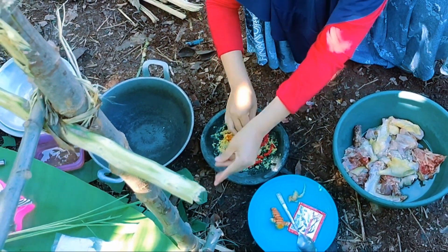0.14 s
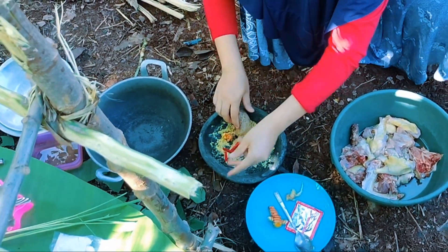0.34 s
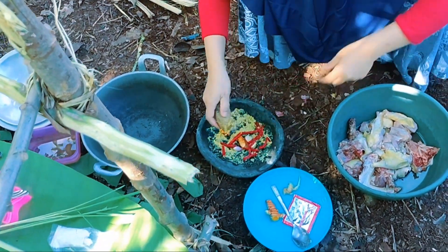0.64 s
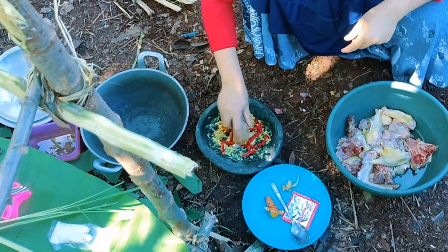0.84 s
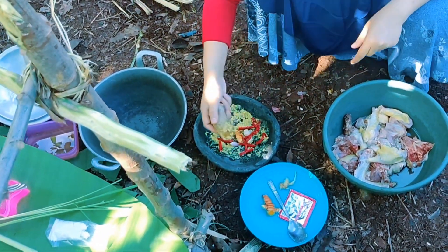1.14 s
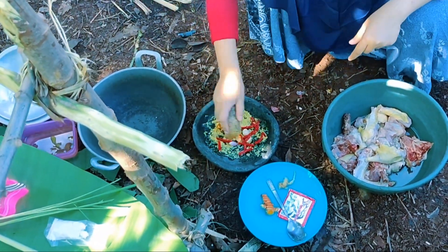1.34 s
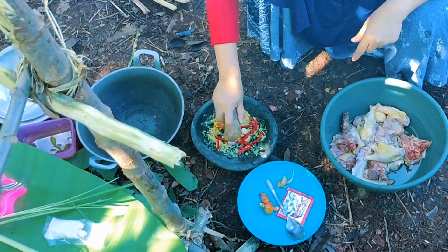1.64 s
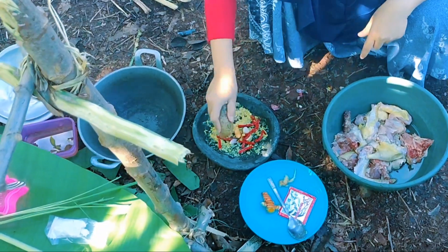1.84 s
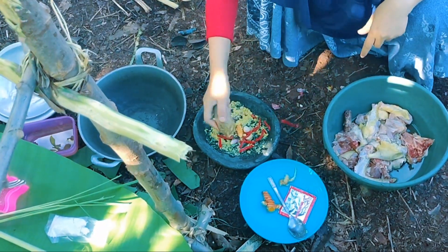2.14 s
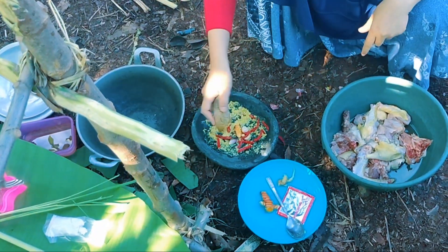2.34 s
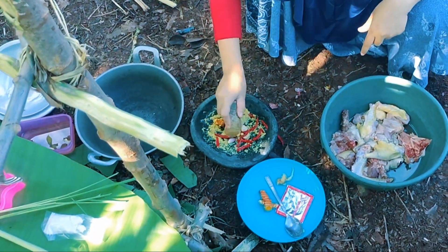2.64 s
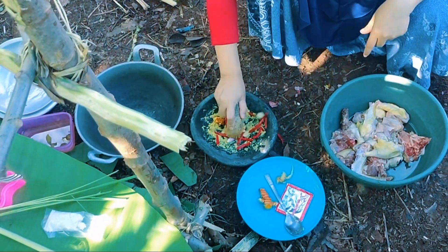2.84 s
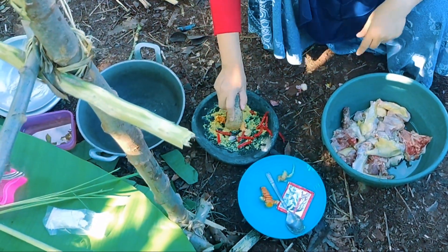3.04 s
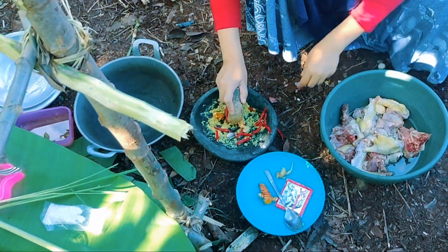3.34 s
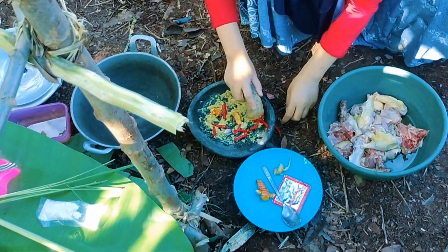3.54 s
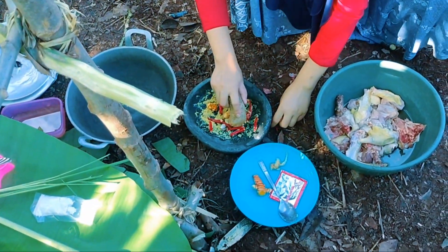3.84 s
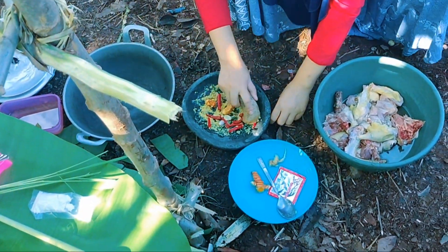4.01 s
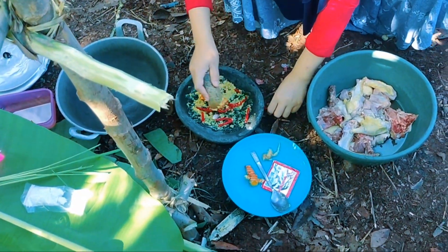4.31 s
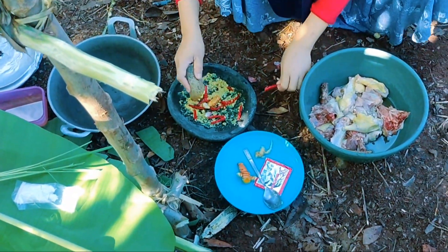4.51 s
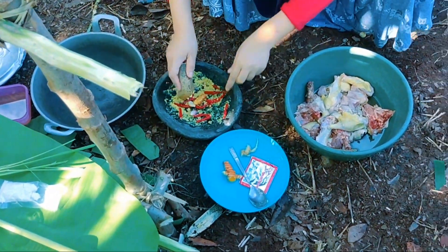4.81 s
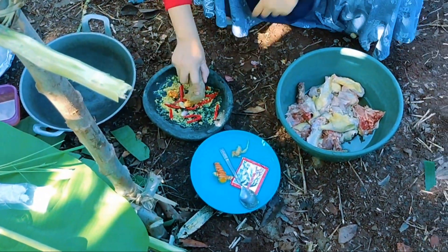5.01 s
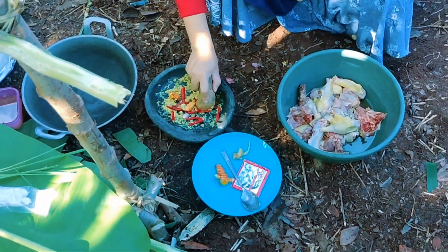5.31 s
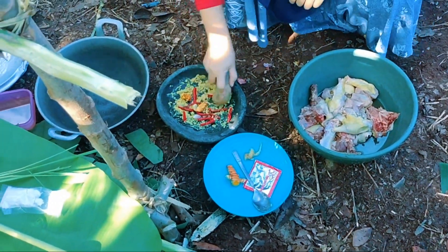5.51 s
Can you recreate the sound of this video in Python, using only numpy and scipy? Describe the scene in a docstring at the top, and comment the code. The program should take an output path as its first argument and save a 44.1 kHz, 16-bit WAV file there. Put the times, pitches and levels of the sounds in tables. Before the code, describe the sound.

Stone pestle grinds and crushes wet chillies in a stone mortar with gritty rasps, snaps and knocks; faint chick peeps, distant engine rumble growing.

```python
"""Chillies and spices are crushed with a stone pestle in a shallow stone mortar on the ground outdoors.
First cloth slides and fingers sweep the pieces together; blows excite damped stone modes, and skins snap.
From 1.5 s grinding strokes grate by stick-slip and crush the pulp with bursts of ringing fractures.
A chick's falling whistles peep faintly from 1.7 s; the hardest knock rings out at 4 s, then clothes rustle.
Throughout, the noise and drifting tones of a distant engine slowly grow; its rumble swells at the end."""
import sys
import numpy as np
from scipy import signal
from scipy.fft import rfft, irfft, next_fast_len
from scipy.io import wavfile

SR = 44100
rng = np.random.default_rng(int(sys.argv[2]) if len(sys.argv) > 2 else 0)


def persist_wave(psi):
    """Save psi, clipped to +-1, as 16-bit WAV."""
    counts = np.round(np.clip(psi, -1, 1) * 32767).astype(np.int16)
    wavfile.write(sys.argv[1], SR, np.atleast_2d(counts).T)


N = 249606
TIME = np.arange(N) / SR


def from_db(db):
    """Logarithmic level: decibels become an amplitude gain."""
    return 10 ** (np.asarray(db) / 20)


def rms_one(x):
    """Normalisation: scale a signal to an rms of 1."""
    return x / np.sqrt(np.mean(x ** 2) + 1e-20)


def at_hz(spectrum, hz):
    """Spectral interpolation: read a level in dB along a logarithmic frequency axis."""
    points = np.array(spectrum)
    return np.interp(np.log(hz), np.log(points[:, 0]), points[:, 1])


def drift(knots_per_s):
    """Random modulation: straight lines join random knots; rms 1."""
    knots = rng.standard_normal(N // 10)
    return rms_one(np.interp(TIME * knots_per_s, np.arange(len(knots)), knots))


def swells(rows, release_s, lag_s=0):
    """Exponential envelope: each gesture (full_s, rise_s, hold_s, level_db) builds up, holds and dies away."""
    out = np.zeros(N)
    for full_s, rise_s, hold_s, level_db in rows:
        t = TIME - full_s - lag_s
        rise = np.minimum(t, 0) / rise_s
        fall = np.maximum(t - hold_s, 0) / release_s
        out += from_db(level_db) * np.exp(rise - fall)
    return out


def noise(spectrum):
    """Spectral shaping: steady coloured noise that falls away steeply outside its range; rms 1."""
    size = next_fast_len(N)
    hz = np.maximum(np.arange(size // 2 + 1) * SR / size, 1)
    skirts = 1 / (1 + (spectrum[0][0] / hz) ** 6) / (1 + (hz / spectrum[-1][0]) ** 12)
    white = rfft(rng.standard_normal(size))
    return rms_one(irfft(white * from_db(at_hz(spectrum, hz)) * skirts, size)[:N])


def ring(force, hz, t60):
    """Damped resonance: a unit click sets off a sine that starts at height 1 and falls 60 dB in t60 seconds."""
    radius = from_db(-60 / (t60 * SR))
    angle = 2 * np.pi * min(hz, .45 * SR) / SR
    # the tiny offset keeps the filter clear of vanishingly small numbers
    return signal.lfilter([0, np.sin(angle)], [1, -2 * radius * np.cos(angle), radius * radius], force + 1e-18)


def soften(x, cut_hz):
    """Contact compliance: a soft contact passes only the lows."""
    return signal.sosfilt(signal.butter(2, min(cut_hz, .45 * SR), fs=SR, output="sos"), x + 1e-18)


def radiate(x, low_hz=560):
    """Radiation efficiency: a small bowl radiates little bass."""
    return signal.sosfilt(signal.butter(2, low_hz, "high", fs=SR, output="sos"), x)


def grit(per_s, spread_db):
    """Random impulse process: tiny fractures at chance moments, of uneven size and sign."""
    sizes = from_db(spread_db * np.minimum(rng.exponential(1, N), 4))
    return sizes * rng.choice([-1, 1], N) * (rng.random(N) < per_s / SR)


def grains(spectrum, per_s, spread_db, cycles, shift=1, count=20):
    """Granular emission: fractures ring for a few cycles at one of many pitches; shift slides the spectrum."""
    clicks = grit(per_s, spread_db)
    dealt = rng.integers(0, count, N)   # which pitch each fracture takes
    out = 0
    for k, hz in enumerate(np.geomspace(spectrum[0][0], spectrum[-1][0], count)):
        rung = ring(clicks * (dealt == k), hz, cycles / hz)
        rung = rms_one(np.diff(rung, prepend=0))
        # the root of the pitch allows for bands that widen with pitch
        out = out + rung * np.sqrt(hz) * from_db(at_hz(spectrum, hz / shift))
    return rms_one(out)


# modes of the mortar, the first two close enough to beat: pitch_hz, level_db, free_t60_s, sign
MORTAR_MODES = [(1672, -12, .065, -1), (1759, -5.5, .085, 1), (310, -28, .04, -1), (630, -28, .024, 1),
                (795, -25, .035, -1), (940, -22, .045, -1), (1255, -24, .035, -1), (1442, -26, .045, 1),
                (1956, -7.7, .0103, 1), (2500, -14, .012, 1), (2900, -22, .007, 1), (3078, -27, .095, 1),
                (3382, -26, .01, 1), (3780, -35, .077, 1), (5885, -31, .024, 1)]
# modes of the pestle, singing as it drags: pitch_hz, relative_db, t60_s, sign
PESTLE_MODES = [(866, -16, 0.019, -1), (2820, -16.5, 0.018, 1), (3100, -18, 0.02, 1),
                (3630, -39.5, .025, 1), (5200, -42.5, .012, -1)]


def stone(force, grip, pestle_db):
    """Modal superposition: both stones ring; pressing them together weakens and shortens the mortar's long modes."""
    longest = MORTAR_MODES[1][2] * grip
    out = 0
    for hz, db, t60, sign in PESTLE_MODES:
        out = out + np.sign(sign) * from_db(db + pestle_db) * ring(force, hz, t60)
    for hz, db, t60, sign in MORTAR_MODES:
        held = min(t60, longest)
        out = out + np.sign(sign) * from_db(db) * np.sqrt(held / t60) * ring(force, hz, held)
    return out


# pestle blows: start_s, level_db, contact_cutoff_hz, grip (share of the ring time left, 0-1), pestle_ring_db
BLOWS = [(0.135, -22, 1200, 0.13, 3), (.424, -37.5, 1800, 0.3, -3), (0.504, -28, 800, 0.26, -8),
         (1.018, -23, 420, 0.8, 3), (1.197, -40.5, 2500, 0.8, 2), (1.6141, -22.5, 1200, 0.35, 21.5),
         (1.6178, -12, 1190, .06, -8), (2.008, -37.5, 3000, 0.8, -11), (2.044, -25.5, 3000, 0.9, -20.5),
         (2.0542, -18.5, 2000, 1, -19), (2.3001, -14, 1300, 0.56, -5), (2.327, -23.5, 3000, 0.64, 3),
         (2.970, -26, 800, 0.02, 26), (3.236, -20, 3000, 1, -14), (3.782, -24, 2500, 1, -17),
         (4.0325, 1.5, 5400, 0.76, -26.5), (4.0386, -2, 900, .2, -4), (4.862, -24.5, 798, 0.24, -5),
         (5.0515, -15, 2970, 0.68, 14), (5.085, -15, 700, 0.39, -6.5), (5.105, -22.5, 695, 0.27, 10),
         (5.467, -40.5, 894, 0.6, 15), (5.593, -25.5, 1300, 0.27, -6), (5.623, -30, 1800, .15, 0)]


def knocks(crack_db=-34, crack_s=0.0021):
    """Impact excitation: blows are sharp on bare stone, dull where spices lengthen the contact."""
    out, t = np.zeros(N + SR), TIME[:SR // 4]
    for start_s, level_db, cut_hz, grip, pestle_db in BLOWS:
        # grit bursts under the blow
        crack = from_db(crack_db) * rng.standard_normal(len(t)) * np.exp(-t / crack_s)
        struck = stone(1.0 * (t == 0), grip, pestle_db) + crack
        at = round(start_s * SR)
        out[at:at + len(t)] += from_db(level_db) * soften(struck, cut_hz)
    return out[:N]


# grinding strokes that reach bare stone: full_s (full pressure), rise_s, hold_s, grating_db, tearing_db, crackle_db
GRINDING = [(1.456, .006, .064, -54.5, -48, -47), (1.772, 0.0083, 0.019, -46, -46, -45),
            (2.046, .005, 0.032, -37.5, -39, -41.5), (2.349, .018, 0.021, -30, -37, -56),
            (2.656, .022, .036, -41.5, -34.5, -40.5), (2.967, .018, .03, -34.5, -36.5, -42),
            (3.191, .005, 0.02, -54.5, -46.5, -49), (3.239, .003, .012, -36.5, -47, -45),
            (3.281, 0.011, 0.016, -34.5, -36.5, -42.5), (3.501, 0.025, 0.059, -42.5, -43, -49),
            (3.682, .006, .012, -48.5, -44, -47.5), (3.775, .009, 0.046, -45.5, -46.5, -44),
            (4.024, .006, .004, -29.5, -45.5, -66.5), (5.46, 0.019, 0.013, -49, -47.5, -48),
            (5.585, .005, .006, -45, -52.5, -55)]


def strokes(column, release_s, lag_s=0):
    """Shared pressure: one hand movement drives the gain of grating, tearing and crackle alike."""
    rows = []
    for full_s, rise_s, hold_s, grating_db, tearing_db, crackle_db in GRINDING:
        levels = dict(grating=grating_db, tearing=tearing_db, crackle=crackle_db)
        rows.append((full_s, rise_s, hold_s, levels[column]))
    return swells(rows, release_s, lag_s)


# as the hand eases, the stone falls silent before the pulp
STONE_RELEASE_S, PULP_RELEASE_S, JUICE_RELEASE_S = 0.013, 0.028, 0.016


def grating(level_db=0, dull_db=1):
    """Stick-slip friction: the rough faces catch and slip, an uneven run of tiny blows."""
    catches = from_db(3.5 * drift(knots_per_s=110))
    slips = grit(per_s=1100, spread_db=2.5)
    # paste dulls some of the slips
    cushioned = from_db(dull_db) * soften(grit(per_s=1500, spread_db=4.5), cut_hz=830)
    body = stone(catches * (slips + cushioned), grip=.48, pestle_db=5)
    return from_db(level_db) * strokes("grating", STONE_RELEASE_S) * rms_one(body)


# bumps of the bowl against the ground under the hands or a hard blow: start_s, relative_db, pitch_hz, t60_s
GROUND_BUMPS = [(0.504, -44, 314, 0.071), (.56, -36.5, 208, 0.15), (1.018, -30.5, 404, 0.036),
                (1.029, -32, 125, 0.107), (2.303, -28, 135, 0.11), (2.661, -31.5, 330, 0.062),
                (3.931, -30.5, 151.7, 0.16), (4.0326, -19, 678, 0.0218)]


def bumps():
    """Impulse response: soft contact with the ground sets off low, damped thuds."""
    out = 0
    for start_s, db, hz, t60 in GROUND_BUMPS:
        click = 1.0 * (np.arange(N) == round(start_s * SR))
        thud = ring(soften(click, cut_hz=1.8 * hz), hz, t60)
        out = out + from_db(db) * radiate(thud, low_hz=hz / 2)
    return out


# spectrum of the bowl's scuff on the soil: frequency_hz, relative_db (per Hz)
SCUFF_SPECTRUM = [(110, -2), (260, -0.5), (350, 1), (450, -8), (580, -5), (720, -7.5)]


def scuffing(level_db=-11, release_s=0.042):
    """Sliding friction: each stroke shifts the bowl a little on the soil, with a dull, lingering scuff."""
    return from_db(level_db) * strokes("grating", release_s) * noise(SCUFF_SPECTRUM)


# lighter squeezes, cushioned by spices: full_s (full pressure), hold_s, tearing_db, crackle_db, tearing_pitch_hz
LIGHT_SQUEEZES = [(.152, 0.0235, -41.5, -62, 3790), (.215, .017, -37, -50, 3750),
                  (.333, .018, -49.5, -56, 3670), (.452, .033, -47, -56, 4400),
                  (.553, .008, -62, -54, 4030), (.643, 0.032, -52.5, -46, 3600),
                  (.745, .008, -72, -56, 3600), (.898, 0.026, -45.5, -49, 4340),
                  (.95, .014, -43.5, -46, 3600), (1.007, .012, -48, -67, 2810),
                  (1.064, .036, -62.5, -52, 3530), (1.13, .016, -50.5, -46, 4100),
                  (1.175, .01, -54.5, -58, 3500), (1.222, .016, -46, -43, 3500),
                  (1.336, .012, -57, -48.5, 4150), (1.375, .01, -49, -53, 3800),
                  (1.708, .005, -41, -40, 4800), (1.817, .012, -42.5, -44.5, 3750),
                  (1.922, .008, -59, -59, 3600), (1.98, .014, -52, -53.5, 4200),
                  (2.015, .02, -60, -54.5, 3730), (2.095, .018, -45.5, -44, 3100),
                  (2.178, .008, -51, -52, 3100), (2.3, .02, -53, -51.5, 3400),
                  (2.383, .018, -44, -38, 3000), (2.45, .025, -56.5, -57, 3600),
                  (2.562, .022, -52, -56, 3700), (2.606, .02, -41.5, -57, 3650),
                  (2.745, .035, -60, -49, 4000), (2.895, .025, -54, -57, 3795),
                  (3.025, .018, -56.5, -51, 3100), (3.37, .1, -50.5, -49.5, 3800),
                  (3.58, .012, -47, -53, 3890), (3.63, .025, -54, -56.5, 3450),
                  (3.745, .01, -54, -52, 4430), (3.865, .03, -54, -54, 3680),
                  (4.102, .012, -50.5, -54.5, 3180), (4.14, .07, -52.5, -54.5, 3800),
                  (5.353, .008, -48, -45, 4700), (5.505, .05, -48.5, -44.5, 3500),
                  (5.625, .035, -51.5, -56, 3000)]
SQUEEZE_RISE_S, SQUEEZE_RELEASE_S = 0.011, 0.014


def squeezes(column):
    """Cushioned pressure: light squeezes drive the gain of tearing and crackle without grating."""
    rows = []
    for full_s, hold_s, tearing_db, crackle_db, _ in LIGHT_SQUEEZES:
        levels = dict(tearing=tearing_db, crackle=crackle_db)
        rows.append((full_s, SQUEEZE_RISE_S, hold_s, levels[column]))
    return swells(rows, SQUEEZE_RELEASE_S)


# spectrum of tearing fibres: frequency_hz, relative_db (per Hz)
TEARING_SPECTRUM = [(700, -29.5), (1500, -20), (2300, -12.5), (3000, -7.5), (3600, 1.5), (4400, -10.5),
                    (5600, -10.5), (7000, -14.5)]
TEARING_HZ = 3600   # the pitch at which that spectrum holds
# spectrum of crackling juice and of sizzling splits: frequency_hz, relative_db (per Hz)
CRACKLE_SPECTRUM = [(4500, -16.5), (5800, -9), (7000, 1), (7700, -11), (8800, -19), (10000, -11),
                    (11200, -8), (13000, -22), (15800, -16)]
JUICE_LAG_S = 0.0067   # juice is pressed out a moment after the stone bites
# pieces pinned hard against the stone tear at a lower pitch
LOOSE_TEAR_HZ, PRESSED_SAG_HZ, FULL_PRESSURE_DB = 3850, 800, -36


def crushing(tear_db=0, wet_db=0):
    """Fracture under load: fibres tear and juice crackles in clumps while the pestle bears down."""
    ground, squeezed = strokes("tearing", PULP_RELEASE_S), squeezes("tearing")
    tearing = np.hypot(ground, squeezed)
    crackling = np.hypot(strokes("crackle", JUICE_RELEASE_S, JUICE_LAG_S), squeezes("crackle"))
    pressure = np.minimum(strokes("grating", PULP_RELEASE_S) / from_db(FULL_PRESSURE_DB), 1)
    ground_hz = LOOSE_TEAR_HZ - PRESSED_SAG_HZ * pressure
    squeezed_hz = np.interp(TIME, [row[0] for row in LIGHT_SQUEEZES], [row[-1] for row in LIGHT_SQUEEZES])
    # the stronger gesture weighs more in the pitch
    tear_hz = (ground * ground_hz + squeezed * squeezed_hz) / (ground + squeezed)
    clumps = rms_one(from_db(2.1 * drift(knots_per_s=130)))
    tear = grains(TEARING_SPECTRUM, per_s=4500, spread_db=3, cycles=22, shift=tear_hz / TEARING_HZ)
    wet = grains(CRACKLE_SPECTRUM, per_s=7000, spread_db=3, cycles=22, count=26)
    return clumps * (from_db(tear_db) * tearing * tear + from_db(wet_db) * crackling * wet)


# skins and seeds splitting: split_s, relative_body_db, relative_sizzle_db, pop_pitch_hz
SPLITS = [(0.212, -34, -54, 3850), (.481, -36.5, -37.5, 4730), (0.62, -58, -35.5, 12800),
          (0.907, -38.5, -29.5, 7250), (.948, -28, -33, 4000), (1.054, -65, -38.5, 7160),
          (1.146, -60, -40.5, 13200), (1.2295, -50, -33, 6900), (1.269, -57, -42.5, 6800),
          (1.43, -30, -37, 3000), (1.453, -37, -32.5, 15000), (1.485, -37, -47, 7000),
          (1.523, -37, -30.5, 6900), (1.615, -43, -30.5, 3100), (1.71, -54, -29.5, 5350),
          (1.79, -39, -32.5, 14000), (1.8245, -51, -33, 3850), (2.278, -52, -32.5, 3800),
          (2.395, -33, -33.5, 6750), (2.649, -29, -24, 6650), (2.711, -47, -33, 6800),
          (2.883, -32.5, -31, 7600), (2.916, -38, -39, 10950), (3.194, -50, -32, 6960),
          (3.2363, -49, -32, 13660), (3.3044, -40, -34, 7200), (3.392, -47, -37, 6630),
          (3.521, -50, -31.5, 6300), (3.578, -38.5, -35, 10800), (3.59, -44, -28.5, 9830),
          (3.684, -46, -37.5, 2970), (3.731, -47, -33, 7100), (3.829, -39.5, -36, 9640),
          (3.864, -55, -33.5, 6940), (4.314, -64, -43.5, 6420), (5.499, -37.5, -38.5, 3020)]


def snaps(body_db=2.0, sizzle_db=-3.0, pop_db=0, pop_cycles=16,
          rise_s=0.00078, fall_s=.004, strain_db=-19, strain_s=0.0073):
    """Brittle avalanche: a skin strains, then splits in many fractures; the opening cavity pops at its own pitch."""
    out, t = np.zeros(N + SR), TIME[:SR // 5] - TIME[SR // 10]
    before, after = np.minimum(t, 0), np.maximum(t, 0)
    strain = from_db(strain_db) * np.exp(before / strain_s)
    burst = np.maximum(1 - np.exp(-after / rise_s), strain) * np.exp(-after / fall_s)
    body = from_db(body_db) * grains(TEARING_SPECTRUM, per_s=9000, spread_db=2.5, cycles=16)
    sizzle = from_db(sizzle_db) * grains(CRACKLE_SPECTRUM, per_s=9000, spread_db=2.5, cycles=20)
    for split_s, low_db, high_db, hz in SPLITS:
        span = round((split_s + t[0]) * SR) + np.arange(len(t))
        pop = from_db(pop_db) * rms_one(ring(rng.standard_normal(len(t)), hz, pop_cycles / hz))
        out[span] += burst * (from_db(low_db) * body[span] + from_db(high_db) * (sizzle[span] + pop))
    return out[:N]


# sleeves and skirt slide as the cook reaches: full_s, rise_s, hold_s, relative_db
CLOTH_REACHES = [(.05, 0.029, 0.1315, -48.5), (4.455, 0.041, 0.08, -42.5), (4.58, 0.041, 0.0427, -47.5),
                 (4.7, 0.032, 0.103, -51.5), (4.86, 0.0086, .02, -48.5), (4.953, 0.02, .13, -44.5),
                 (5.245, 0.046, 0.12, -51)]
# spectrum of sliding cloth: frequency_hz, relative_db (per Hz)
CLOTH_SPECTRUM = [(290, 8), (500, 0.5), (773, -5), (855, -9), (946, -7), (1320, -11.5), (2130, -5),
                  (4150, -0.5), (5880, -4.5), (7100, -0.5), (8700, -11.5), (14700, -10), (16000, -10)]
# fingers sweep the spices together once: full_s, rise_s, hold_s, level_db
FINGER_SWEEP = [(.025, 0.026, .09, -43.5)]
# spectrum of the swept pieces: frequency_hz, relative_db (per Hz)
SWEEP_SPECTRUM = [(500, -10), (900, -7), (1500, -12), (2100, -4.5), (2600, 2), (3200, -7), (4200, -30)]
CLOTH_RELEASE_S, SWEEP_RELEASE_S = 0.0461, .03


def rustling(cloth_db=-1.0, flutter_db=1.6):
    """Friction noise: cloth slides with a soft hiss; fingers sweep the loose pieces together."""
    flutter = from_db(cloth_db + flutter_db * drift(knots_per_s=190))
    cloth = flutter * swells(CLOTH_REACHES, CLOTH_RELEASE_S) * noise(CLOTH_SPECTRUM)
    pieces = grains(SWEEP_SPECTRUM, per_s=3000, spread_db=2.0, cycles=31)
    return cloth + swells(FINGER_SWEEP, SWEEP_RELEASE_S) * pieces


# the chick's peeps: start_s, length_s, first_pitch_hz, last_pitch_hz, relative_db
CHICK_PEEPS = [(1.68, 0.13, 3390, 3040, -51.5), (2.166, 0.032, 3100, 3010, -52.5),
               (2.251, 0.067, 4320, 3270, -47), (2.535, 0.13, 4370, 3370, -43),
               (2.904, 0.13, 4000, 3180, -41), (3.178, 0.13, 4290, 3234, -38),
               (3.411, 0.13, 4220, 3650, -45), (3.59, .08, 3565, 3070, -52),
               (3.878, 0.0762, 3800, 3160, -45.5), (4.158, 0.07, 4210, 3853, -52)]


def chick(level_db=-8.5):
    """Frequency modulation: thin falling whistles, made hoarse by fast wobble of pitch and level."""
    out = np.zeros(N)
    wobble = 1 + .026 * drift(knots_per_s=700)
    flutter = rms_one(from_db(4 * drift(knots_per_s=200)))
    for start_s, length_s, first_hz, last_hz, db in CHICK_PEEPS:
        along = np.clip((TIME - start_s) / length_s, 0, 1)
        hz = wobble * (first_hz + (last_hz - first_hz) * along)
        envelope = np.sqrt(2 * np.abs(np.sin(np.pi * along)))
        out += from_db(db) * envelope * np.sin(2 * np.pi * np.cumsum(hz) / SR)
    return from_db(level_db) * flutter * out


def yard(x, wet_db, t60):
    """Diffuse scattering: ground, basins and posts return a short, exponentially decaying tail."""
    t = TIME[:SR // 2]
    tail = soften(rng.standard_normal(len(t)), cut_hz=11000) * from_db(-60 * t / t60) * (t > .004)
    return x + from_db(wet_db) * signal.fftconvolve(x, tail / np.linalg.norm(tail))[:N]


# the engine's drone: pitch_hz (centre), relative_db
ENGINE_DRONE = [(80, -7), (135, -4.5), (160, -14.5), (184, -16), (275, -15), (370, -17.5)]
# spectrum of the engine's rumble: frequency_hz, relative_db (per Hz)
RUMBLE_SPECTRUM = [(12, -41), (20, -11), (75, -1.5), (103, -1.5), (136, 3), (194, -5), (244, -9),
                   (275, -10), (373, -9.5), (432, -24), (480, -20.5), (620, -45), (1060, -120)]
# the rumble swells in its upper range: full_s, rise_s, hold_s, level_db
RUMBLE_SURGES = [(5.3, .5, 0.47, -44.5)]
# spectrum of that swell: frequency_hz, relative_db (per Hz)
SURGE_SPECTRUM = [(130, -3), (160, 0), (205, 0), (260, -10), (330, -20)]
# spectrum of the hiss: frequency_hz, relative_db (per Hz)
HISS_SPECTRUM = [(240, -36.5), (400, -13), (496, -19), (777, -19), (893, -26.5), (1530, -31), (2320, -29),
                 (4440, -30), (5520, -35), (6050, -29.5), (10700, -36), (12900, -34.5), (14600, -30),
                 (16000, -54)]
ENGINE_DB, ENGINE_GROWTH_DB_PER_S = -47, 1.17   # level at the start, before the trims below; growth
SURGE_RELEASE_S, AIR_DB = .06, -57


def background(rumble_db=-2, hiss_db=-1, wander_hz=4, swell_db=3, uneven_db=1.5):
    """Tones in noise: a far engine rumbles and drones, slowly growing, under a faint even hiss."""
    drone = 0
    for hz, db in ENGINE_DRONE:
        phase = 2 * np.pi * np.cumsum(hz + wander_hz * drift(knots_per_s=18)) / SR
        drone = drone + from_db(db + swell_db * drift(knots_per_s=5)) * np.sin(phase)
    rumble = from_db(rumble_db + uneven_db * drift(knots_per_s=15)) * noise(RUMBLE_SPECTRUM)
    growth = from_db(ENGINE_DB + ENGINE_GROWTH_DB_PER_S * TIME)
    surges = swells(RUMBLE_SURGES, SURGE_RELEASE_S) * noise(SURGE_SPECTRUM)
    hiss = from_db(AIR_DB + hiss_db) * noise(HISS_SPECTRUM)
    return growth * (rumble + drone) + surges + hiss


def scene():
    """Direct-to-reverberant ratio: the work is close and dry; the chick's echo equals its direct sound."""
    bowl = radiate(knocks() + grating()) + bumps() + scuffing()
    near = yard(bowl + crushing() + snaps() + rustling(), wet_db=-19.5, t60=0.18)
    far = yard(chick(), wet_db=0.0, t60=0.16)
    return (near + far + background())[None]


# resonances of the microphone port: pitch_hz, gain_db, width_hz
PORT_RESONANCES = [(6230, -1, 860), (6920, 1.5, 780), (9280, 0, 1500), (10980, 3, 700), (15000, 1.5, 2500)]
CUTOFF_HZ = 16000


def record(dry):
    """Resonance and band limiting: the microphone port colours the treble, peaks clip, and the top is cut."""
    for hz, db, width_hz in PORT_RESONANCES:
        b, a = signal.iirpeak(hz, hz / width_hz, fs=SR)
        dry = dry + (from_db(db) - 1) * signal.lfilter(b, a, dry)
    top_cut = signal.ellip(10, .1, 80, CUTOFF_HZ, fs=SR, output="sos")
    return signal.sosfilt(top_cut, np.clip(dry, -1, 1))


dry = scene()
out = record(dry)
persist_wave(out)
```